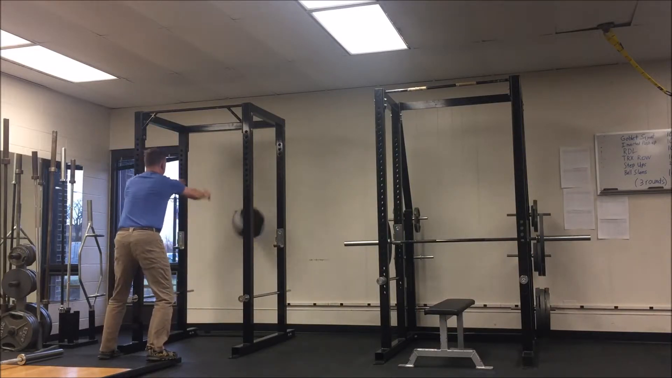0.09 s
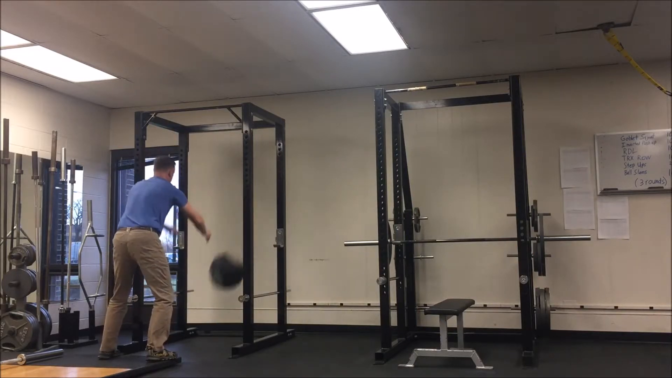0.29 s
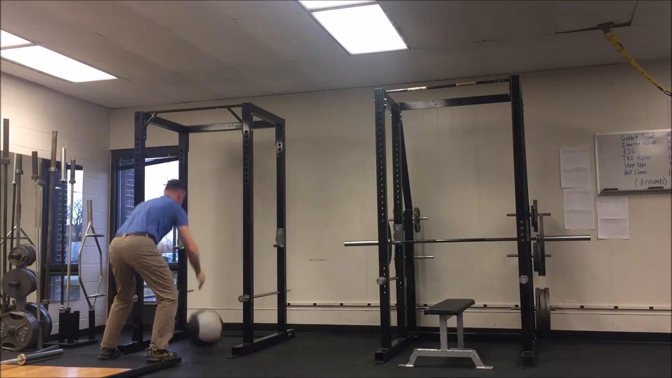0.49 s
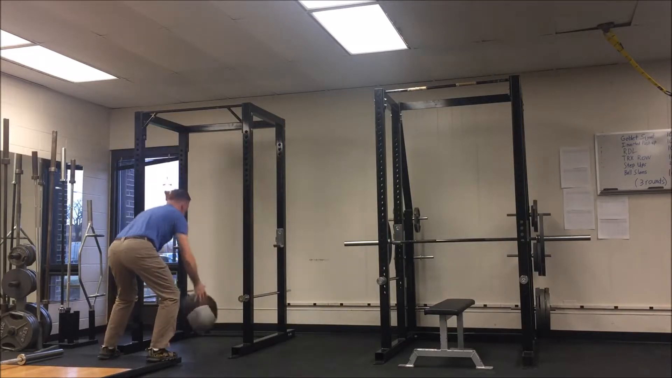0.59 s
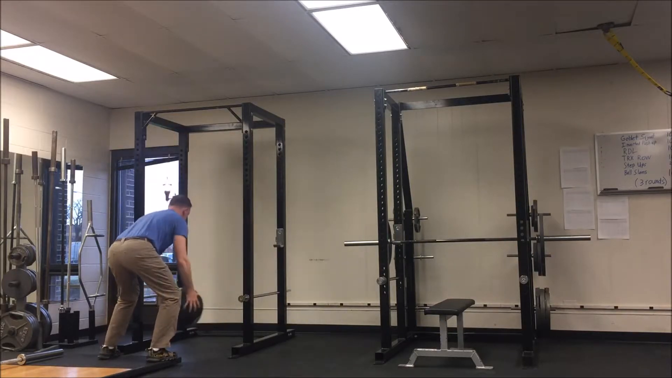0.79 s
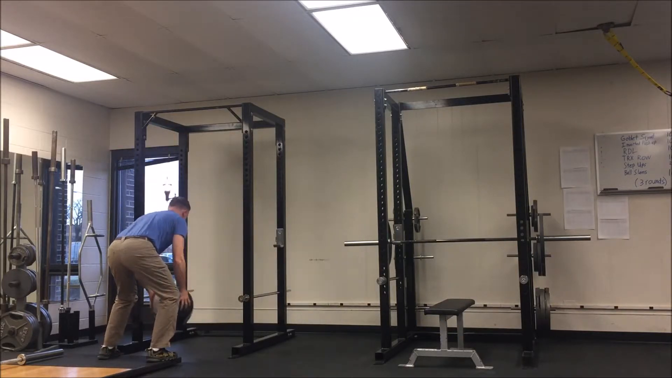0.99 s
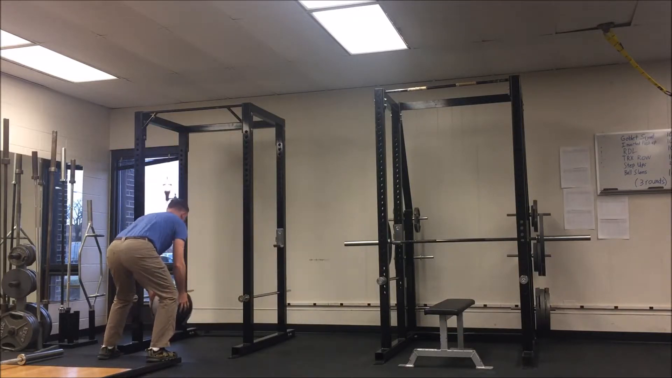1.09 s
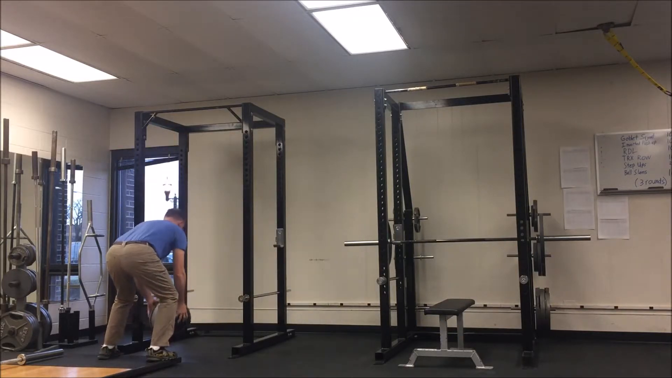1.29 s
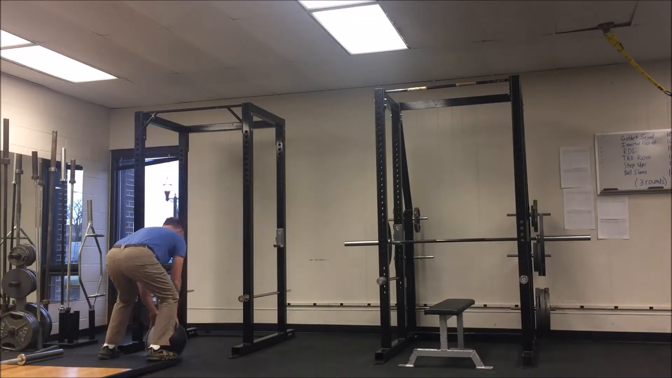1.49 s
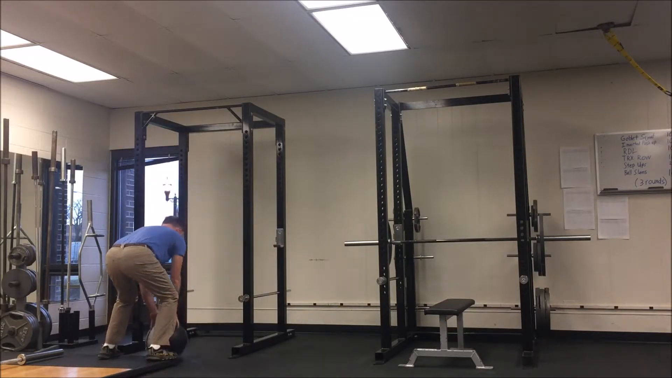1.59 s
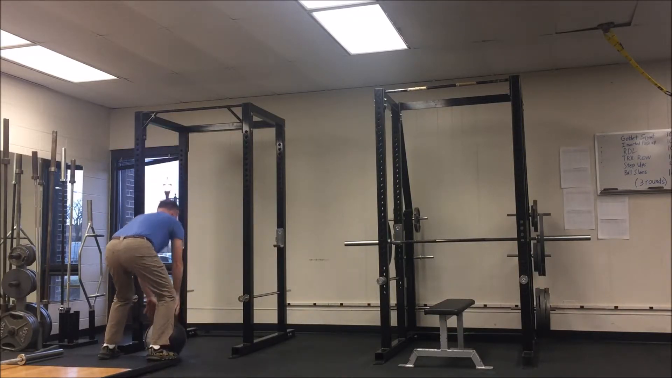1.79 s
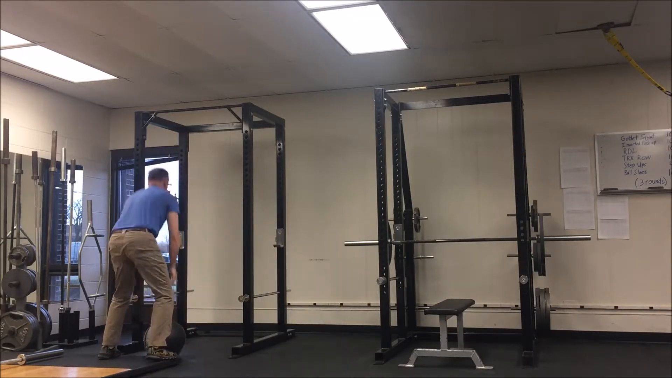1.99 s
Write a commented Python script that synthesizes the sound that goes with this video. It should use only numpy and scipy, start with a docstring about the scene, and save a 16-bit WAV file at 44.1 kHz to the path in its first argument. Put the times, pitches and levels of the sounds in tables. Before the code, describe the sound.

Heavy medicine ball slams hard, thuds again on the rubber floor, then a faint slap of hands

```python
"""A heavy medicine ball is slammed against the wall of a hard-walled weight room and drops onto the rubber floor.
It slides briefly with a soft hiss, and a second later it is slapped as it is gathered up. One microphone hears it.
Each blow is coloured noise scattered by the room, plus pressure pulses, a reflected crack and decaying sines for
the ball's filling, the booming building and the faintly ringing steel racks. The slide is fine noise with a drawn
level. Behind it all lie ventilation noise, a two-tone fan hum and reverberation dying away from the start."""
import sys
import numpy as np
from scipy import signal
from scipy.fft import rfft, irfft
from scipy.io import wavfile

SR = 44100
rng = np.random.default_rng(int(sys.argv[2]) if len(sys.argv) > 2 else 0)


def transcribe(u):
    """Save the signal u as a 16-bit wav file named by the first command-line argument.

    u: samples, shape (n,) or (channels, n), limited to [-1, 1]; the rate is SR.
    q: integer samples, one column per channel.
    """
    v = np.clip(np.atleast_2d(u).T, -1, 1)
    q = np.round(v * 32767).astype(np.int16)
    wavfile.write(sys.argv[1], SR, q)


N = 88200
T = np.arange(N) / SR  # seconds
HZ = np.maximum(np.fft.rfftfreq(N, 1 / SR), 1)

# The three blows: slam on the wall, landing on the floor, slap in the hands.
# Each row: start in seconds, smack level in dB, build-up in seconds (halved in use), hold in seconds,
# early t60 in seconds before the band factor, late tail in dB over the smack, factor on the room t60,
# boom in dB, rack ring in dB, crack in dB, crack delay in seconds.
BLOWS = [(.2002, -14, 0.00081, 0.018, 0.21, -5.5, 0.97, -18.5, -31.5, -27.5, .014),
         (.6290, -18, 0.00067, 0.016, .17, -4.5, 0.95, -26.5, -35, -19, 0.004),
         (1.5966, -29, 0.0025, 0.015, 0.21, -0.5, 0.73, -47, -50, -37, 0.015)]
# Colour of each smack. Each row: frequency in Hz, then slam, landing and slap in relative dB per Hz.
SMACK_COLOUR = [(55.57, -2, -18, -11), (93, -4, -7, -13), (157.4, -1, -1, -7), (290, -4, -3.5, -3.5),
                (450, -1.5, -0.5, -2), (710, -2.5, -1.5, -6.5), (1240, -9.5, -7.5, -6),
                (2149, -11, -8, -15), (3200, -11, -12, -11.5), (6500, -15.5, -18, -25.5),
                (9260, -20, -21.5, -25), (12500, -27.5, -25, -32), (15500, -32, -28, -33)]
# Peaks and hollows in each blow's spectrum, from its close echoes, one list per blow.
# Each row: frequency in Hz, width in Hz, boost in dB.
BLOW_PEAKS = [
    [(199, 25, 1), (300, 54, 3.5), (496, 33, 5.5), (765, 19, -6.5), (885, 70, 3.5), (1030, 37, 2),
     (1420, 88, 8), (1547, 58, 6.5), (2060, 44, 3.5), (4900, 720, -5.5), (7740, 630, -5.5),
     (10600, 530, -4)],
    [(175, 55, 8.5), (490, 59, -9), (555, 41, 9.5), (770, 45, 1), (860, 70, -3), (990, 60, 4),
     (1307, 50, 6.5), (1660, 80, -4.5), (2136, 120, 4.5), (5520, 220, 6.5), (9500, 400, 5)],
    [(318.4, 27, 14), (373, 28, 4.5), (490, 23, 1), (750, 120, 5), (887, 50, -8), (1160, 89, 3.5),
     (1284, 81, -10), (1430, 69, 3.5), (1545, 49, 7), (1910, 71, 10), (2310, 90, 9), (6700, 1900, 7.5)],
]
# First contact and its first echoes off nearby surfaces.
# Each row: delay in seconds, peak in dB over the smack level.
CONTACT_PATHS = [(.0005, 3), (.0062, 1), (0.0217, 3.5), (0.0498, -6.5)]
# Bright crack reflected off floor or wall. Each row: frequency in Hz, relative level in dB per Hz.
CRACK_COLOUR = [(800, -11.5), (2000, 2), (6500, -0.5), (10000, -7.5), (15500, -14)]
# Air pushed aside as the ball flattens, one row per blow.
# Each row: pulse peak in dB, delay in seconds, width in seconds.
AIR_PUSHES = [(-7.5, .0034, 0.001), (-19.5, 0.0033, .0011), (-37.5, 0.0018, 0.00042)]
# Thumps of the ball's filling, one list per blow. Each row: frequency in Hz, level in dB, t60 in seconds.
FILLING_THUMPS = [
    [(131.7, -18.5, 0.25), (201.9, -13.5, .2), (292, -10.5, .2)],
    [(152.4, -15, 0.29), (196, -16, 0.25)],
    [(327, -31, 0.15), (402, -34, 0.43), (519, -27.5, 0.24), (756, -30.5, .17)],
]
# Hard knock of the wall under the slam. Each row: frequency in Hz, relative level in dB per Hz.
KNOCK_COLOUR = [(300, -17.5), (600, -9), (950, 0), (1550, -0.5), (2200, -13.5), (6000, -29)]
# Boom of wall and floor. Each row: frequency in Hz, level in dB over the blow's boom, t60 in seconds.
BUILDING_MODES = [(44.5, 2.5, 0.37), (41.7, -8.5, 1.8), (63.1, -11, 1.9)]
# Steel racks. Each row: frequency in Hz, level in dB over the blow's rack ring, t60 in seconds.
RACK_MODES = [(205, -1, 1.4), (305.4, -0.5, 0.86), (357, 4, 0.71), (410.8, -5, 1.2), (447.4, -3, 0.54),
              (532, 2, 0.33), (617, 2.5, 0.57), (659, 7.5, 0.31), (707, -7.5, 1), (916, 12.5, 0.19),
              (1561, -6.5, 0.29)]
# Ball cover rubbing along. Each row: time in seconds, level in dB.
SLIDE_LEVEL = [(.872, -85), (.886, -51.5), (.905, -62), (.93, -51.5), (0.981, -55), (1.015, -59),
               (1.07, -82)]
# Hiss of the slide. Each row: frequency in Hz, relative level in dB per Hz.
SLIDE_COLOUR = [(1500, -0.5), (3500, 3), (6000, -0.5), (10000, -4), (15500, -4.5)]
# Decay of the room. Each row: frequency in Hz, t60 in seconds before each use scales it.
ROOM_T60 = [(60, 1.5), (180, 1.3), (400, 1.05), (800, 0.8), (1600, 0.65), (3200, 0.67), (8000, 0.4),
            (16000, 0.19)]
# Early decay across the bands. Each row: frequency in Hz, factor on the blow's early t60.
EARLY_T60_FACTORS = [(80, 1.1), (300, 2.6), (1200, 1.0), (4000, 1.29), (13000, .8)]
# Ventilation. Each row: frequency in Hz, relative level in dB per Hz.
VENTILATION_COLOUR = [(15, -47), (25, -8), (97, 0), (137, -5.5), (200, -5.5), (317, -19.5), (384, -12.5),
                      (439, -21.5), (641, -23.5), (1130, -38.5), (1230, -35.5), (1940, -41.5), (9070, -53),
                      (16000, -59)]
# Fan hum. Each row: frequency in Hz, rms level in dB.
FAN_TONES = [(87, -54.5), (173, -54)]
# Reverberation already dying at the start. Each row: frequency in Hz, relative level in dB per Hz.
FADING_COLOUR = [(60, -18), (250, 6), (700, -5.5), (2000, -27), (8000, -35.5), (15000, -38.5)]


def blows():
    """Each blow smacks, cracks and thumps, sets the building booming and shakes the racks."""
    out = 0
    for k, row in enumerate(BLOWS):
        start_s, smack_db, build_s, hold_s, early_t60, tail_db, tail_scale = row[:7]
        boom_db, rack_db, crack_db, crack_delay_s = row[7:]
        t = np.maximum(T - start_s, 0)
        comb_db = ripple()
        body = smack(t, blow_colour(k) + comb_db, build_s, hold_s, early_t60, tail_db, tail_scale)
        out = out + from_db(smack_db) * (body + contact(t))
        out = out + from_db(crack_db) * crack(t, crack_delay_s, comb_db)
        out = out + pulse(t, *AIR_PUSHES[k]) + thump(t, k)
        out = out + from_db(boom_db) * boom(t) + from_db(rack_db) * racks(t)
    return out


def blow_colour(k):
    """Spectrum of blow k in dB: a broad colour plus the peaks and hollows from its close echoes."""
    shape_db = at_hz(np.array(SMACK_COLOUR)[:, [0, k + 1]], HZ)
    for hz, width_hz, boost_db in BLOW_PEAKS[k]:
        shape_db = shape_db + boost_db / (1 + (2 * (HZ - hz) / width_hz) ** 2)
    return shape_db


def ripple():
    """The cover lands in many tiny slaps, which comb the treble unevenly (dB)."""
    depth_db, span_s, from_hz = 2.0, 0.0062, 2500
    comb = rfft(rng.standard_normal(N) * (T < span_s)).real
    treble = HZ ** 2 / (HZ ** 2 + from_hz ** 2)
    return depth_db * np.minimum(comb / comb.std(), 1.5) * treble


def smack(t, shape_db, build_s, hold_s, early_t60, tail_db, tail_scale):
    """The cover's smack scattered by the room: a dense early burst, then a tail with its own decay per band."""
    bass_lag_cycles, tail_build_s = 0.13, .02
    out = 0
    for hz, band in octaves(noise(shape_db)):
        early = dying(np.maximum(t - hold_s, 0), early_t60 * at_hz(EARLY_T60_FACTORS, hz))
        tail_decay = dying(t, tail_scale * at_hz(ROOM_T60, hz))
        late = from_db(tail_db) * rising(t, tail_build_s) * tail_decay
        onset = rising(t, build_s / 2 + bass_lag_cycles / hz)  # bass swells more slowly
        out = out + band * onset * np.hypot(early, late)
    return out


def contact(t):
    """The sharp pulse of first contact, repeated by the nearest surfaces over paths about 2, 7 and 17 m longer."""
    return sum(pulse(t, db, delay_s, width_s=.00022) for delay_s, db in CONTACT_PATHS)


def pulse(t, db, delay_s, width_s):
    """One N-shaped pressure pulse, a push and then a pull on the air."""
    u = (t - delay_s) / width_s
    return -from_db(db) * u * np.exp((1 - u * u) / 2) * (t > 0)


def crack(t, delay_s, comb_db):
    """Bright crack reflected off floor or wall: a bell-shaped burst of treble noise shortly after contact."""
    width_s = 0.008
    swell = (t > 0) * np.exp(-((t - delay_s) / width_s) ** 2)
    return swell * noise(at_hz(CRACK_COLOUR, HZ) + comb_db)


def thump(t, k):
    """The ball's filling resonates in a few short-lived modes."""
    return rising(t, 0.0086) * ring(t, FILLING_THUMPS[k])


def knock():
    """The wall answers the slam with a short, hard knock of noise."""
    level_db, rise_s, hold_s, t60_s = -18.5, 0.00033, 0.016, .035
    t = np.maximum(T - BLOWS[0][0], 0)
    envelope = rising(t, rise_s) * dying(np.maximum(t - hold_s, 0), t60_s)
    return from_db(level_db) * envelope * noise(at_hz(KNOCK_COLOUR, HZ))


def boom(t):
    """Wall and floor boom in low modes that start just after the blow."""
    delay_s, rise_s = 0.0018, .012
    late = np.maximum(t - delay_s, 0)
    return rising(late, rise_s) * ring(late, BUILDING_MODES)


def racks(t):
    """The shaken steel racks ring in many modes."""
    return rising(t, 0.012) * ring(t, RACK_MODES)


def slide():
    """The ball's cover rubs along with a short, fine hiss of noise."""
    time_s, db = np.transpose(SLIDE_LEVEL)
    sliding = (T > time_s[0]) * (T < time_s[-1])
    return from_db(np.interp(T, time_s, db)) * sliding * noise(at_hz(SLIDE_COLOUR, HZ))


def ventilation():
    """Steady air noise, mostly a low rumble."""
    return from_db(-44.5) * noise(at_hz(VENTILATION_COLOUR, HZ))


def fan_hum():
    """Steady fan tones, each starting at a random phase."""
    out = 0
    for hz, rms_db in FAN_TONES:
        out = out + from_db(rms_db) * np.sqrt(2) * np.sin(2 * np.pi * (hz * T + rng.random()))
    return out


def fading_reverberation():
    """A last trace of reverberation, each band dying away from the start."""
    level_db, t60_share = -40, 0.46  # share of the room's t60
    out = 0
    for hz, band in octaves(noise(at_hz(FADING_COLOUR, HZ))):
        out = out + band * dying(T, t60_share * at_hz(ROOM_T60, hz))
    return from_db(level_db) * out


def from_db(db):
    """Decibels to gain."""
    return 10 ** (np.asarray(db) / 20)


def at_hz(points, hz):
    """Read a table on a log-frequency axis."""
    f, v = np.transpose(points)
    return np.interp(np.log(hz), np.log(f), v)


def dying(t, t60):
    """Exponential decay, 60 dB down after t60 seconds."""
    return np.exp(-np.log(1000) * t / t60)


def rising(t, rise_s):
    """Smooth onset with time constant rise_s, silent before time zero."""
    return 1 - np.exp(-np.maximum(t, 0) / max(rise_s, 1e-5))


def noise(shape_db):
    """Noise with the given spectrum, rolled off below 20 Hz; rms 1."""
    rolloff = np.sqrt(1 + (20 / HZ) ** 8)
    x = irfft(rfft(rng.standard_normal(N)) * from_db(shape_db) / rolloff, N)
    return x / x.std()


def octaves(x):
    """Split into overlapping octave bands that sum to the whole: (centre Hz, band)."""
    centres, spectrum = 62.5 * 2 ** np.arange(9), rfft(x)
    for hz, weights in zip(centres, np.eye(len(centres))):
        yield hz, irfft(spectrum * np.interp(np.log(HZ), np.log(centres), weights), N)


def ring(t, modes):
    """Struck modes as decaying sines, each with a slightly different strength every time."""
    out = 0
    for strength, (hz, db, t60) in zip(rng.uniform(.88, 1.12, len(modes)), modes):
        out = out + strength * from_db(db) * np.sin(2 * np.pi * hz * t) * dying(t, t60)
    return out


def scene():
    """Ball and room at one microphone."""
    ball = blows() + knock() + slide()
    room = ventilation() + fan_hum() + fading_reverberation()
    return (ball + room)[None]


def record(dry):
    """The microphone channel loses the deepest bass, rounds the peaks and cuts the top."""
    low_cut_hz, ceiling, top_cut_hz = 35, .85, 15900
    low_cut = signal.butter(6, low_cut_hz, "high", fs=SR, output="sos")
    top_cut = signal.ellip(10, .2, 80, top_cut_hz, fs=SR, output="sos")
    x = signal.sosfilt(low_cut, dry)
    rounded = ceiling * np.tanh(x / ceiling)
    return signal.sosfilt(top_cut, rounded)


dry = scene()
out = record(dry)
transcribe(out)
```